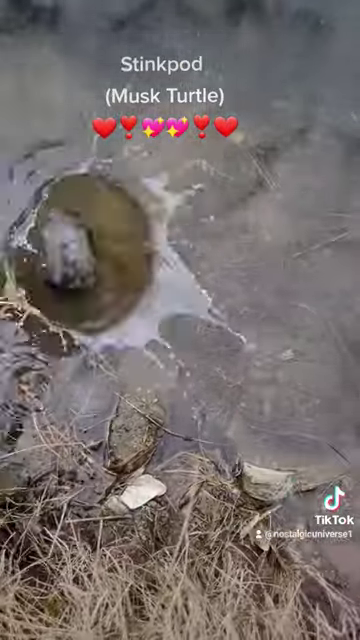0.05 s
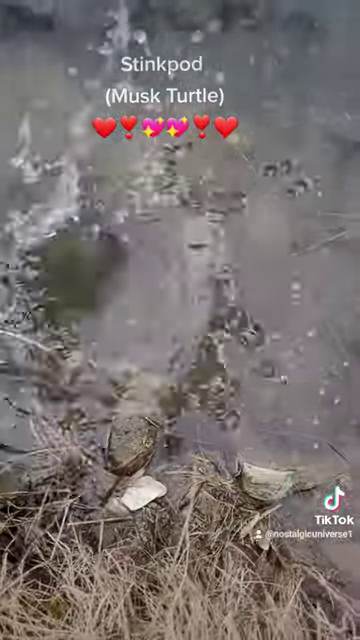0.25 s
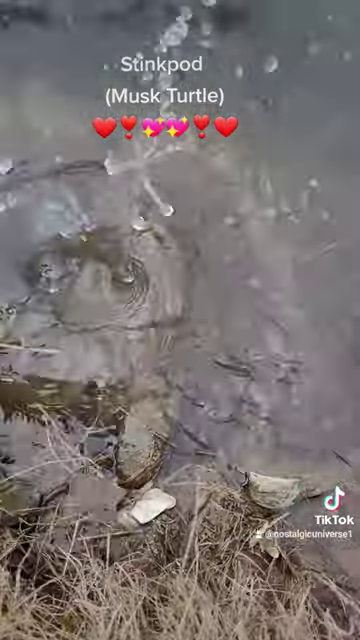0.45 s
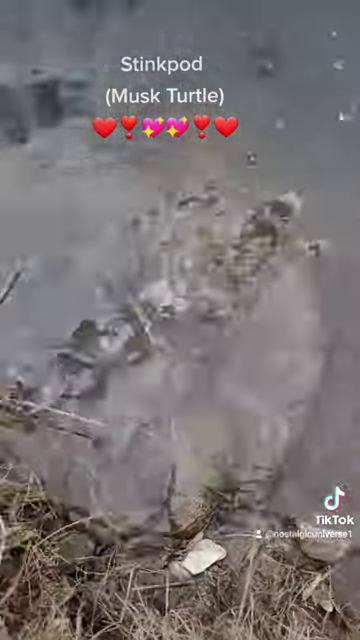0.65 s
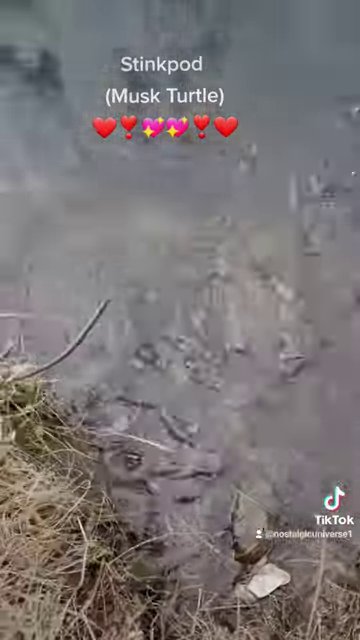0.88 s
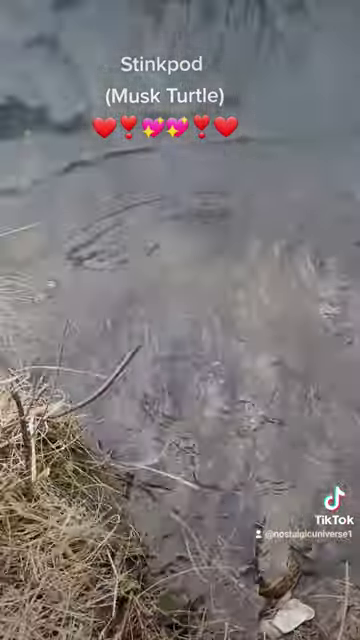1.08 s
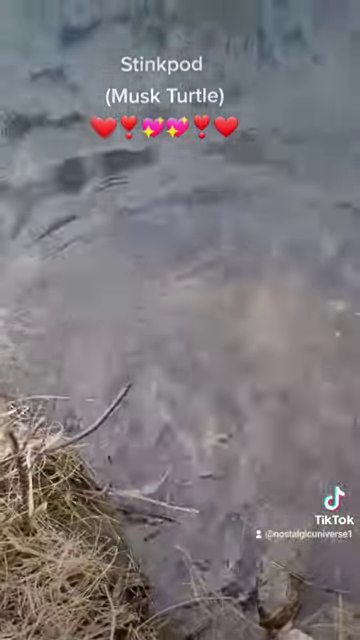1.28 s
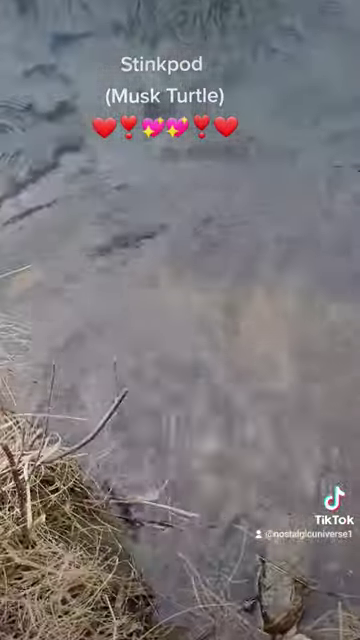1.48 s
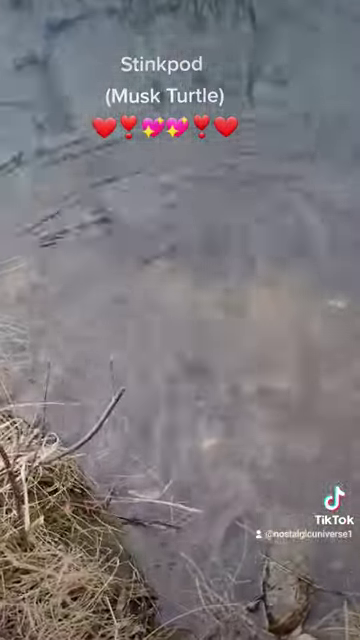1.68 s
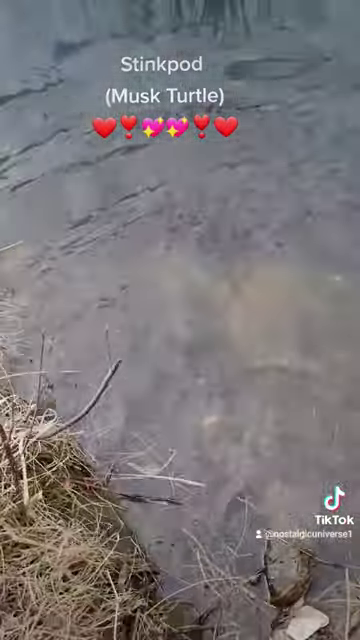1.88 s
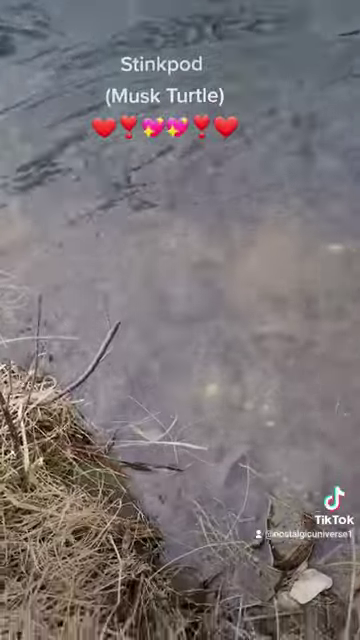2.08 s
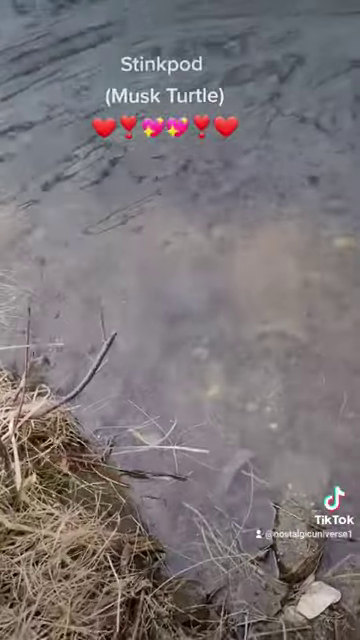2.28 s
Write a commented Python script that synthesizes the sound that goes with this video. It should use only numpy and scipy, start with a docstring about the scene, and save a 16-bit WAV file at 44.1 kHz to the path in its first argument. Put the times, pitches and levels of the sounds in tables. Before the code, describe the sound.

A single sharp splash as a stone drops into the shallows of a pond, heard close up from the bank. Droplets fall back with small plinks, followed by soft, low gusts of wind on the microphone.

```python
"""A stone drops into the shallows of a pond and traps a pocket of air that pops loudly.
It skims the surface with a hiss and throws up a sheet of water; the spray patters back as ticking
drops and small ringing bubbles over a low slosh. Then wind buffets the two microphone ports of a
phone on the bank, a metre away. Distant air, stirred water and a thin hiss lie underneath."""
import sys
import numpy as np
from scipy import signal
from scipy.fft import rfft, irfft
from scipy.io import wavfile

SR = 44100
rng = np.random.default_rng(int(sys.argv[2]) if len(sys.argv) > 2 else 0)


def wav_out(sig):
    """Save sig, one row per channel (or a flat mono array), as 16-bit PCM at SR to the path in sys.argv[1]."""
    wavfile.write(sys.argv[1], SR, np.round(np.clip(np.atleast_2d(sig).T, -1, 1) * 32767).astype(np.int16))


N = 108045
TIME = np.arange(N) / SR


def undb(db):
    """Decibels to gain."""
    return 10 ** (np.asarray(db) / 20)


def fader(rows):
    """Gain over time from (s, dB) points."""
    return undb(np.interp(TIME, *np.array(rows).T))


def on_bins(rows):
    """(Hz, value) points spread over the frequency bins."""
    hz, value = np.array(rows).T
    return np.interp(np.log(np.arange(N // 2 + 1) * SR / N + 1), np.log(hz), value)


def noise(eq, tilt_db=0, grain=0):
    """Coloured noise of rms 1; grain turns it into dense crackle."""
    white = rng.standard_normal(N)
    if grain:
        white *= np.exp(grain * rng.standard_normal(N))
    tilted = [(hz, db + tilt_db * np.log2(hz)) for hz, db in eq]
    coloured = irfft(rfft(white) * undb(on_bins(tilted)), N)
    return coloured / coloured.std()


def pair(eq, tilt_db=0):
    """Unrelated noise at each port."""
    return np.array([noise(eq, tilt_db), noise(eq, tilt_db)])


def add(out, start, sound):
    """Mix a sound in at a time in seconds."""
    i = int(np.clip(start * SR, 0, N - 1))
    out[i:i + len(sound)] += sound[:N - i]


def low_cut(x, hz, order):
    """Roll off the bass."""
    return signal.sosfilt(signal.butter(order, hz, "high", fs=SR, output="sos"), x)


# Tone of the open air. Each row: frequency in Hz, gain in dB.
AIR_EQ = [(100, -6.5), (300, 0.5), (550, -3.5), (800, -10.5), (1100, -16), (1700, -20.5), (2500, -33.5),
          (6000, -41)]

def air():
    """A steady, dark bed of distant air."""
    return undb(-61) * (noise(AIR_EQ) + .5 * pair(AIR_EQ))


# Hiss on the right. Each row: time in seconds, level in dB.
HISS_FADER = [(0, -59.5), (.08, -60), (.12, -64), (.45, -55), (1.0, -55), (1.1, -58.5), (1.4, -54.5),
              (1.55, -59.5), (1.7, -66), (1.88, -66.5), (2.0, -57.5), (2.13, -59.5), (2.3, -62.5),
              (2.35, -55.5), (2.45, -55.5)]
# Its balance. Each row: time in seconds, left relative to right in dB.
HISS_BALANCE = [(0, -4), (1.0, -2), (1.4, -6), (1.7, -14), (2.45, -7)]
# Its tone. Each row: frequency in Hz, gain in dB.
HISS_EQ = [(500, -6.5), (2500, -12), (4500, -5), (6500, -0.5), (7700, -0.5), (8700, -6), (11000, -0.5),
           (15500, -0.5)]

def hiss():
    """A thin hiss that leans to the right."""
    return fader(HISS_FADER) * pair(HISS_EQ) * np.array([fader(HISS_BALANCE), np.ones(N)])


# Swells of the water. Each row: time in seconds, level in dB.
WASH_FADER = [(0, -62), (.08, -93), (.3, -63), (.5, -60), (.9, -58), (1.02, -55), (1.1, -69), (1.4, -60),
              (1.5, -72), (1.8, -80), (2.45, -78.5)]
# Their tone. Each row: frequency in Hz, gain in dB.
WASH_EQ = [(300, -2.5), (1000, 2), (2000, -0.5), (4200, -2.5), (7000, -17), (15000, -25.5)]

def wash():
    """Stirred water makes a soft, grainy wash."""
    return fader(WASH_FADER) * (.41 * noise(WASH_EQ, grain=.21) + .7 * pair(WASH_EQ))


# Light rumble. Each row: time in seconds, left and right levels in dB.
BREEZE_FADER = [(0, -43.5, -49.5), (.06, -64, -62), (.1, -46, -51), (.33, -44, -43.5), (.48, -47.5, -64.5),
                (.7, -48, -45), (.76, -36.5, -41), (.82, -55, -52), (.97, -58, -49.5), (1.551, -46, -62.5),
                (1.75, -51, -57.5), (2.0, -50, -63), (2.2, -47, -55.5), (2.45, -56.5, -61)]
# Buffets. Each row: start and length in seconds, left and right levels in dB, tilt in dB per octave.
GUST_CUES = [(1.006, 0.013, -36, -31, 2.5), (1.021, 0.027, -34.5, -36.5, -2.5),
             (1.054, 0.051, -39, -62.5, -6), (1.114, 0.038, -31.5, -38.5, -1),
             (1.165, 0.038, -44.5, -34.5, -1), (1.23, 0.046, -37, -31.5, 0), (1.279, 0.039, -36, -33, -0.5),
             (1.319, 0.044, -34.5, -36.5, 1.5), (1.367, 0.052, -39.5, -37, 1.5),
             (1.437, 0.059, -37, -41, 2), (1.455, 0.0267, -34.5, -45.5, 0), (1.617, 0.055, -51.5, -39.5, 0),
             (1.757, 0.04, -48.5, -49, 0), (1.925, 0.06, -52.5, -54, 0), (2.066, 0.0248, -36.5, -38, -4),
             (2.1, 0.02, -35, -37.5, 1)]
# Tone of both. Each row: frequency in Hz, gain in dB.
WIND_EQ = [(15, -28.5), (35, -6.5), (58, 1.5), (100, -4), (160, -13.5), (280, -16), (420, -28.5),
           (700, -44.5), (2000, -67.5)]

def wind(edge_s=.0091):
    """A light rumble, and gusts that hit each port with their own eddies."""
    when, left, right = np.array(BREEZE_FADER).T
    out = np.array([fader(np.c_[when, db]) for db in (left, right)]) * pair(WIND_EQ)
    for start, length, left_db, right_db, tilt_db in GUST_CUES:
        inside_s = np.minimum(TIME - start, start + length - TIME)
        ramp = np.clip(inside_s / edge_s / 2 + .5, 0, 1)
        eddies = pair(WIND_EQ, tilt_db) + .58 * noise(WIND_EQ, tilt_db)
        eddies *= np.sin(np.pi / 2 * ramp) ** 2
        rms = np.sqrt((eddies ** 2).sum(axis=1, keepdims=True) / (length * SR))
        out += undb([[left_db], [right_db]]) * eddies / rms
    return out


def burst(start, attack, hold, decay):
    """Envelope with a straight rise, a hold and an exponential tail."""
    rise = np.clip((TIME - start) / attack, 0, 1)
    return rise * np.exp(-np.maximum(TIME - start - attack - hold, 0) / decay)


# Water slopping round the hole. Each row: start in seconds, level in dB, decay in seconds.
SLOSH_CUES = [(0.091, -40, 0.0065), (0.296, -50, 0.016), (0.417, -46.5, 0.01), (0.539, -45, 0.018),
              (0.628, -45, 0.02), (0.732, -55, 0.055)]
# Its tone. Each row: frequency in Hz, gain in dB.
SLOSH_EQ = [(40, -11), (110, -4), (200, -4), (350, 5), (520, -10.5), (1000, -27.5), (3000, -56)]

def sloshes(attack_s=.0036):
    """Soft low slaps as the surface heaves."""
    envelope = sum(undb(db) * burst(start, attack_s, 0, decay) for start, db, decay in SLOSH_CUES)
    return envelope * (noise(SLOSH_EQ) + .5 * pair(SLOSH_EQ))


# Delay at the right port. Each row: frequency in Hz, lag in radians.
RIGHT_LAG = [(500, .3), (1500, 0.55), (3400, .3), (4800, 1.3), (6200, 1.9), (7600, 2.09), (9500, 4.1),
             (15500, 4.2)]
# Its tone. Each row: frequency in Hz, gain in dB.
RIGHT_EQ = [(200, 0), (550, 2), (900, -1.5), (2700, 0.05), (3800, 1.5), (6000, 2.5), (7500, 2), (10000, 3),
            (15500, 2.5)]

def ports(splash):
    """The splash reaches the right port a little later and brighter."""
    response = undb(on_bins(RIGHT_EQ)) * np.exp(-1j * on_bins(RIGHT_LAG))
    return np.array([splash[0], irfft(rfft(splash[1]) * response, N)])


# Tone of the reflections. Each row: frequency in Hz, gain in dB.
BANK_EQ = [(200, -21.5), (1500, -8), (3500, -1), (7000, 4), (15500, -3.5)]

def bank(splash, decay_s=.006):
    """The bank scatters a short, bright tail to both ports."""
    tail = pair(BANK_EQ) * np.exp(-TIME / decay_s) * np.sqrt(2 / (decay_s * SR))
    return undb(-17) * signal.fftconvolve(splash, tail, axes=1)[:, :N]


# Stereo width of the splash. Each row: frequency in Hz, share of power unrelated between ports.
SPLASH_WIDTH = [(100, 0.022), (1500, .02), (3000, 0.092), (5000, 0.2), (15500, 0.4)]

def water_patch(eq, tilt_db=0, grain=0):
    """Crackle from a patch of water: centred in the bass, wider in the treble."""
    share = on_bins(SPLASH_WIDTH)
    common, left, right = (rfft(noise(eq, tilt_db, grain)) for _ in range(3))
    return irfft(np.sqrt(1 - share) * common + np.sqrt(share) * np.array([left, right]), N)


def droplets(per_second=280):
    """The finest droplets land as sparse bright clicks of uneven size, rms 1."""
    chance, size = rng.random((2, N))
    clicks = low_cut((chance < per_second / SR) * (size - .5), hz=2700, order=2)
    return clicks / clicks.std()


def bubble(hz, db, t60, glide):
    """A dying sine whose pitch glides, in octaves per t60, as the bubble nears the surface."""
    age = np.arange(int(t60 * SR) + 2) / (t60 * SR)
    pitch = np.minimum(hz * 2 ** (glide * age), SR / 2)
    return undb(db - 60 * age) * np.sin(2 * np.pi * np.cumsum(pitch) / SR)


# Falling spray. Each row: middle and spread in seconds, bubble level in dB, pitch in Hz, fizz in dB.
SHOWER_CUES = [(0.178, 0.033, -50.5, 3720, -47), (.3, 0.057, -60, 4500, -59), (.595, .017, -51, 2768, -50),
               (0.647, 0.02, -46, 2000, -45.5), (0.732, .024, -49, 2880, -51),
               (0.809, 0.044, -56.5, 2300, -73)]
# Tone of the fizz. Each row: frequency in Hz, gain in dB.
FIZZ_EQ = [(150, -17), (450, -5.5), (1400, -4.5), (3200, -1), (5500, 1), (7400, -1.5), (9500, -10),
           (15500, -11.5)]

def spray(count=70, scatter_octaves=.73, scatter_db=4, ring_cycles=20, lag_s=.0001):
    """Each shower is a cloud of tiny bubbles over a fine fizz."""
    out, fizz_envelope = np.zeros((2, N)), 0
    for middle, spread, db, centre_hz, fizz_db in SHOWER_CUES:
        for when, pitch, size, ring, side in np.clip(rng.standard_normal((count, 5)), -2, 2):
            hz = centre_hz * 2 ** (scatter_octaves * pitch)
            t60 = ring_cycles * 2 ** (ring / 2) / hz
            plink = bubble(hz, db + scatter_db * size, t60, glide=.35)
            start = middle + spread * when
            add(out[0], start, plink)
            add(out[1], start + lag_s * side, plink)  # drops land all around
        fizz_envelope += undb(fizz_db) * np.exp(-.5 * ((TIME - middle) / spread) ** 2)
    return out + fizz_envelope * (water_patch(FIZZ_EQ, grain=1) + droplets())


# Drop impacts. Each row: start in seconds, level in dB, decay in seconds, low and high cuts in Hz.
TICK_CUES = [(0.04, -45.5, 0.00095, 5100, 16000), (0.0925, -26, 0.00094, 2020, 18000),
             (0.0932, -28.5, 0.0011, 6000, 18000), (0.109, -30, 0.0022, 3500, 14900),
             (.1655, -37, 0.0011, 5000, 12000), (.173, -32.5, 0.002, 1400, 8900),
             (.189, -39, 0.0013, 3000, 12000), (0.2912, -32, 0.002, 5520, 15500),
             (.318, -36, 0.0015, 4530, 11900), (0.329, -39.5, 0.0014, 4500, 14000),
             (.397, -42.5, 0.00116, 3945, 13000), (.5499, -18.5, 0.00066, 9150, 18700),
             (0.6035, -33.5, 0.0019, 3000, 14000), (0.6235, -34, 0.00184, 3500, 15000),
             (0.6382, -28.5, 0.0018, 5000, 15000), (0.662, -38, 0.003, 4000, 15000),
             (.7168, -30.5, 0.0012, 4000, 14000), (0.7222, -38, 0.00116, 4500, 10000),
             (.7495, -39.5, .003, 7000, 16000), (0.7542, -35.5, 0.001, 2000, 7900),
             (.7875, -42.5, 0.0018, 1200, 9000), (0.795, -37, 0.0013, 5960, 15000),
             (.853, -49, .003, 2000, 8000), (0.8713, -33.5, 0.00095, 1300, 8000),
             (1.123, -39.5, .001, 8270, 18000), (1.412, -51.5, 0.0022, 1007, 12000),
             (2.158, -47.5, 0.00097, 4920, 16000), (2.264, -48.5, 0.00096, 5090, 17000),
             (2.283, -46.5, 0.00104, 5520, 17070), (2.42, -51.5, 0.0011, 700, 4500)]

def ticks(attack_s=.0001):
    """Single drops crack as they flatten on the surface."""
    out, t = np.zeros((2, N)), TIME[:SR // 40]
    for start, db, decay, low_hz, high_hz in TICK_CUES:
        band = signal.butter(2, [low_hz, high_hz], "band", fs=SR, output="sos")
        common, left, right = signal.sosfilt(band, rng.standard_normal((3, len(t))))
        envelope = np.minimum(t / attack_s, 1) * np.exp(-t / decay)
        for port, crack in zip(out, (common + left, common + right)):
            add(port, start, crack / crack.std() * undb(db) * envelope)
    return out


# Sheets of water. Each row: start in seconds, level in dB, attack, hold and decay in seconds,
# tilt in dB per octave.
SHEET_CUES = [(0.088, -32.5, 0.002, 0.011, 0.011, 4.5), (0.2182, -38, 0.0027, 0.007, 0.004, -1.5),
              (0.229, -24, 0.003, 0.0035, 0.006, -2.5), (0.2374, -16, 0.001, 0.005, 0.0052, 1),
              (0.251, -35, 0.0024, 0.0085, 0.016, 3.5), (0.599, -43.5, .001, 0.006, 0.0025, -3.5),
              (0.6245, -44.5, .001, 0.0078, 0.0043, -5), (0.648, -47.5, 0.0016, 0.012, 0.005, -6),
              (0.752, -43.5, 0.0014, 0.005, 0.0035, -2.5)]
# Their tone. Each row: frequency in Hz, gain in dB.
SHEET_EQ = [(100, -38), (190, -28), (290, -11), (420, -16), (600, -8.5), (800, -5.5), (1050, -15),
            (1700, -4), (3200, 3), (4200, -4), (5500, -9), (7400, 0.5), (9000, -9), (12000, -4.5),
            (15500, -5)]

def sheets():
    """Water tears open in short crackling bursts."""
    return sum(undb(db) * burst(start, attack, hold, decay) * water_patch(SHEET_EQ, tilt_db, grain=.7)
               for start, db, attack, hold, decay, tilt_db in SHEET_CUES)


# Small bubbles. Each row: start in seconds, pitch in Hz, level in dB, t60 in seconds,
# glide in octaves per t60.
DRIP_CUES = [(0.159, 7330, -21, 0.0063, -0.09), (0.0908, 2480, -28, 0.0082, 0.23),
             (0.1882, 1580, -34.5, 0.023, 0.47), (.2072, 5230, -19, 0.0076, -0.044),
             (0.216, 3220, -25, 0.0059, -0.12), (0.2214, 10500, -27, 0.03, 0.33),
             (0.2303, 2900, -22, 0.014, -0.27), (0.237, 3000, -9, 0.0136, 0.19),
             (0.2375, 1910, -14, 0.0133, 0.025), (0.2414, 4630, -21, 0.0108, 0),
             (.5498, 9400, -27, 0.00465, -0.36), (.5713, 2720, -34, 0.0066, 0.29),
             (.835, 1760, -48, 0.05, 0.82), (.2412, 15040, -17, 0.017, -0.0068),
             (0.2395, 7270, -21.5, 0.042, 0), (0.251, 3060, -23.5, 0.0093, -0.28),
             (.264, 3000, -43, 0.023, 0.13), (0.325, 3000, -38.5, 0.014, 0.18),
             (.3295, 4450, -33, .007, 0.19), (0.5598, 4584, -38, .015, -0.19),
             (.585, 805, -44, 0.23, -0.76), (0.585, 2750, -39.5, 0.033, 0.39),
             (0.603, 3700, -25.5, 0.009, 0.4), (0.6035, 2870, -31.5, 0.0104, .2),
             (0.6102, 3500, -32.5, 0.019, -0.54), (0.6228, 1285, -26.5, 0.032, 0.32),
             (.632, 1860, -36, .025, 0.31), (0.632, 840, -38, .03, -0.12),
             (0.6365, 7460, -14.5, 0.0073, 0.22), (0.644, 552, -37.5, 0.15, -0.61),
             (0.6512, 1280, -33.5, 0.0215, 0.67), (0.662, 1250, -37, 0.025, 0.76),
             (0.6659, 2120, -34, 0.016, 0.63), (.665, 2850, -41, 0.0106, .1),
             (0.709, 2850, -41, 0.034, 0.95), (0.7162, 1390, -38.5, 0.0186, -0.33),
             (.724, 925, -41.5, .04, 0.44), (0.723, 5600, -28.5, 0.011, 0.16), (.722, 540, -46, 0.075, -.3),
             (0.7334, 1496, -33, 0.028, 0.77), (.739, 2330, -38, 0.025, 0.86),
             (.754, 1930, -38, 0.0188, 0.4), (.7555, 3480, -38.5, 0.01, 0.076),
             (0.7871, 3360, -36, 0.0098, -0.095), (.781, 1560, -44, 0.042, .2),
             (0.852, 3440, -41.5, 0.016, 0.53), (.854, 2160, -40, 0.026, 1.4),
             (0.8713, 2560, -28, 0.0067, -0.24), (0.871, 1540, -36, 0.012, 0.6)]

def drips(pinch_s=.00043, flutter_s=.0006, flutter_depth=.48):
    """Bubbles pinch off and ring while churning water shakes their level."""
    out = np.zeros(N)
    for start, hz, db, t60, glide in DRIP_CUES:
        ring = bubble(hz, db, t60, glide)
        t = TIME[:len(ring)]
        swell = 1 - np.exp(-t / pinch_s)
        churn = np.interp(t / flutter_s, np.arange(256), rng.standard_normal(256))
        add(out, start, ring * swell * (1 + flutter_depth * churn))
    return out


# Tones of the main pop. Each row: start in seconds, pitch in Hz, level in dB, t60 in seconds,
# glide in octaves per t60.
POP_TONES = [(0.2339, 1506, -4.5, 0.018, -0.56), (0.2337, 2450, -14.5, 0.016, 0.49),
             (.2385, 770, -19.5, 0.017, -0.13), (0.2386, 556, -20.5, 0.046, -0.3),
             (0.2392, 3020, -8, 0.0065, .1), (0.24, 289, -32.5, .14, -1.7), (.247, 1440, -37, 0.051, -0.18),
             (.264, 480, -44, 0.053, -1.6)]

def air_pocket():
    """The air trapped by the stone rings and collapses in one loud pop."""
    out = np.zeros(N)
    for start, hz, db, t60, glide in POP_TONES:
        add(out, start, bubble(hz, db, t60, glide))
    return out


def scene():
    """The splash and its reflections over wind and the outdoor bed."""
    splash = air_pocket() + drips() + ticks() + sheets() + spray()
    splash = low_cut(splash, hz=257, order=3)  # the bass of the splash is rolled off
    return ports(splash) + bank(splash) + sloshes() + wind() + air() + hiss() + wash()


def record(dry):
    """The phone clips peaks just under full scale and cuts the top."""
    high_cut = signal.ellip(10, .2, 80, 15750, fs=SR, output="sos")
    return signal.sosfilt(high_cut, np.clip(dry, -.9, .9))


dry = scene()
out = record(dry)
wav_out(out)
```